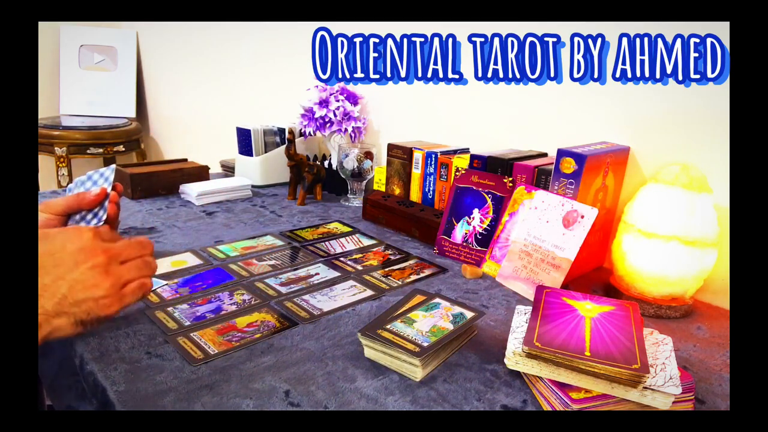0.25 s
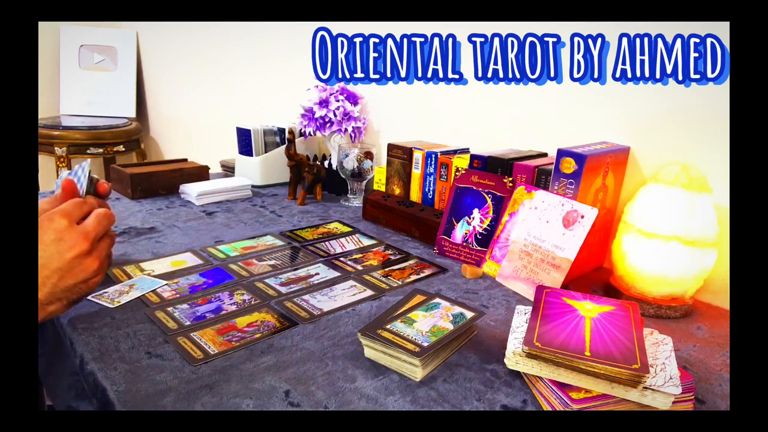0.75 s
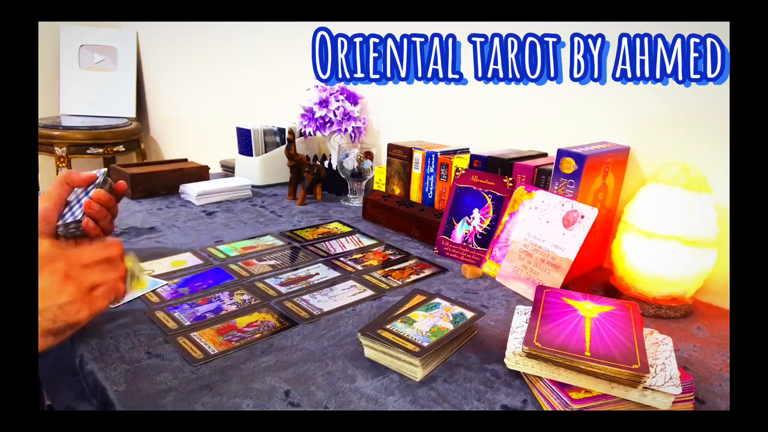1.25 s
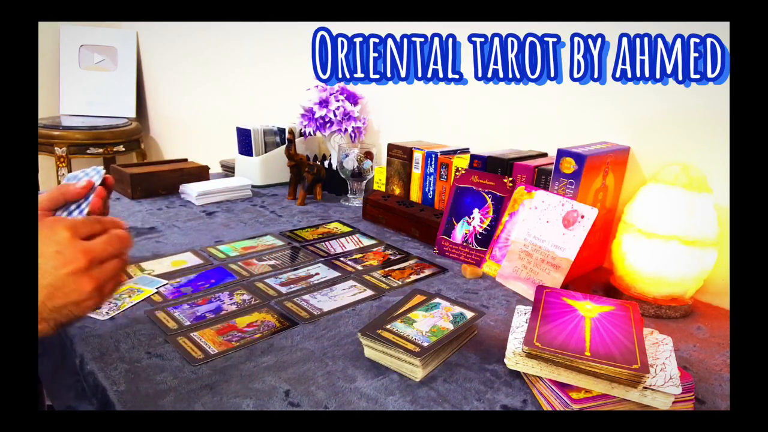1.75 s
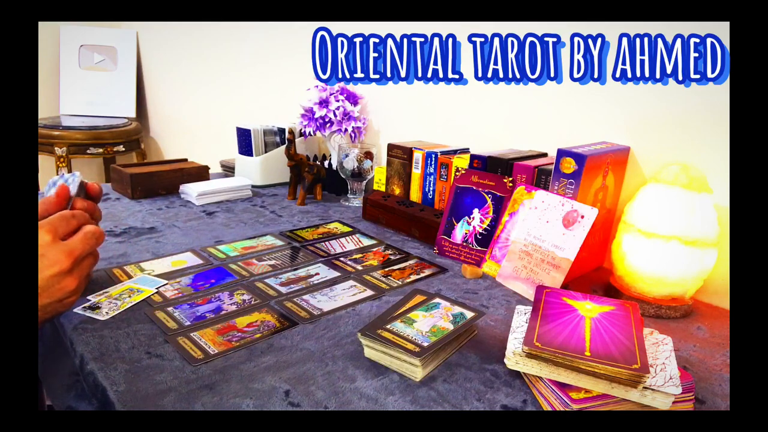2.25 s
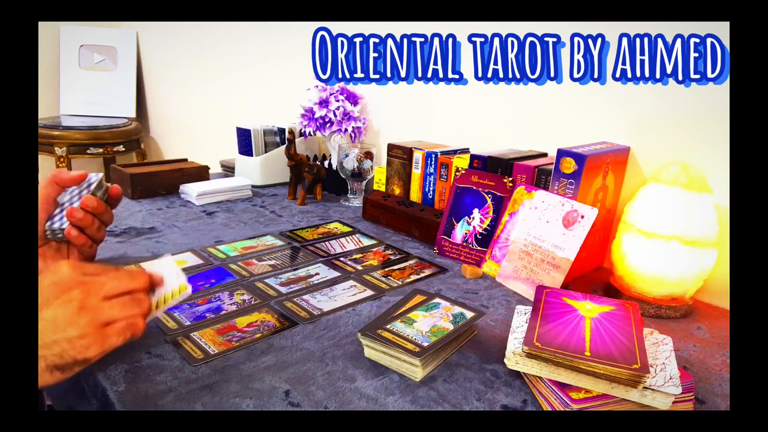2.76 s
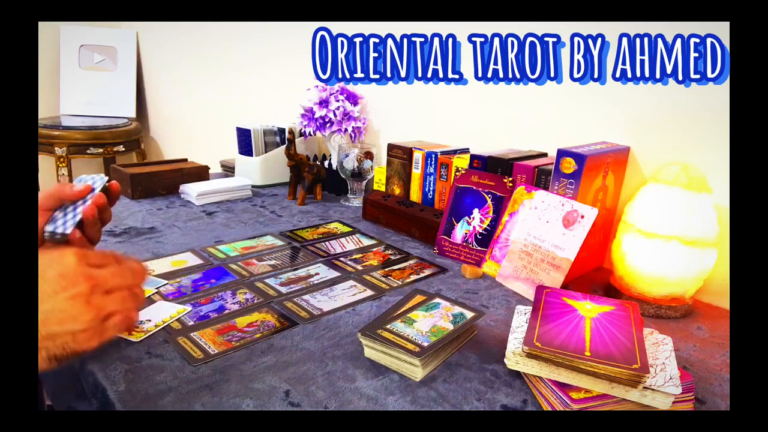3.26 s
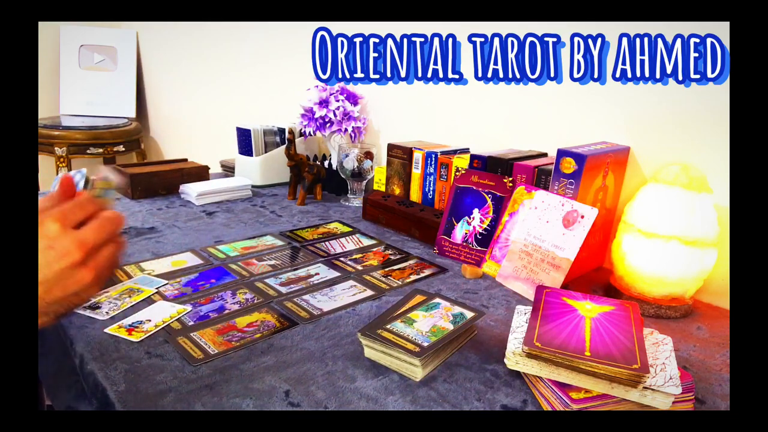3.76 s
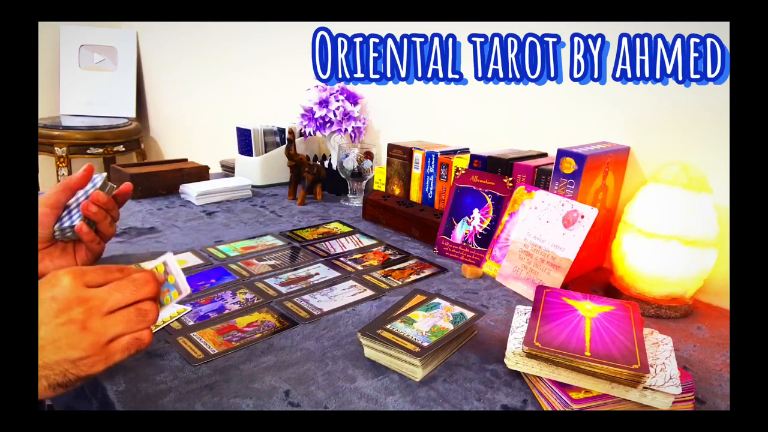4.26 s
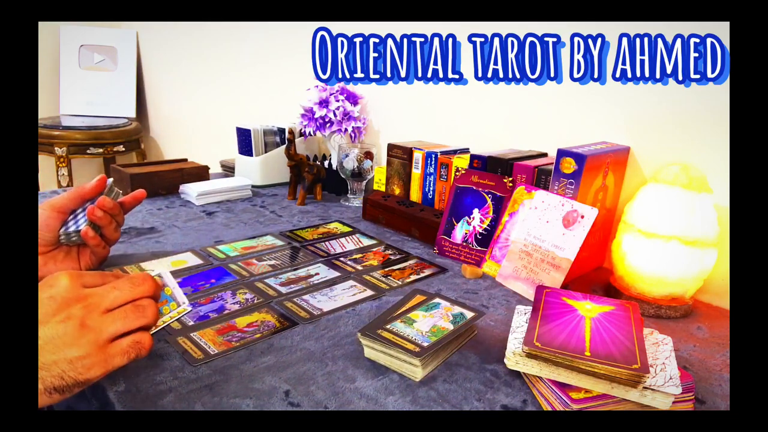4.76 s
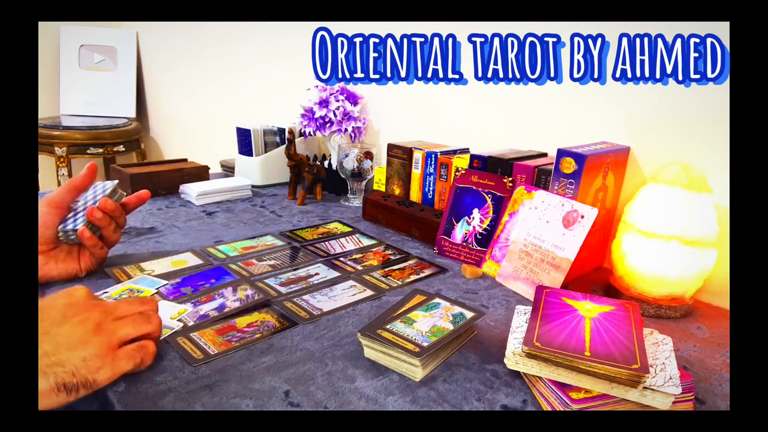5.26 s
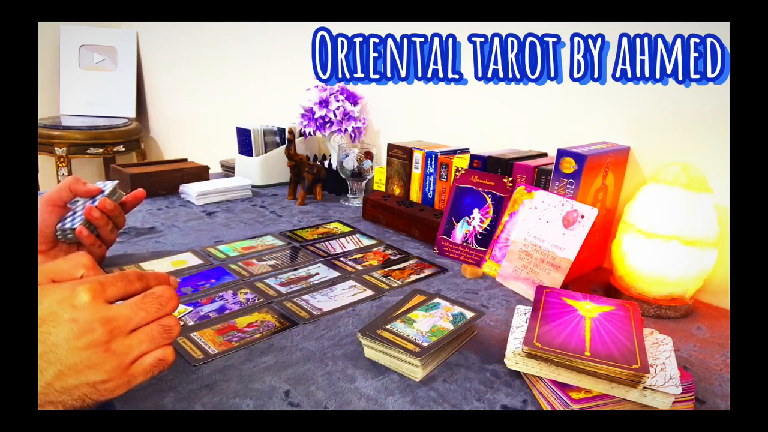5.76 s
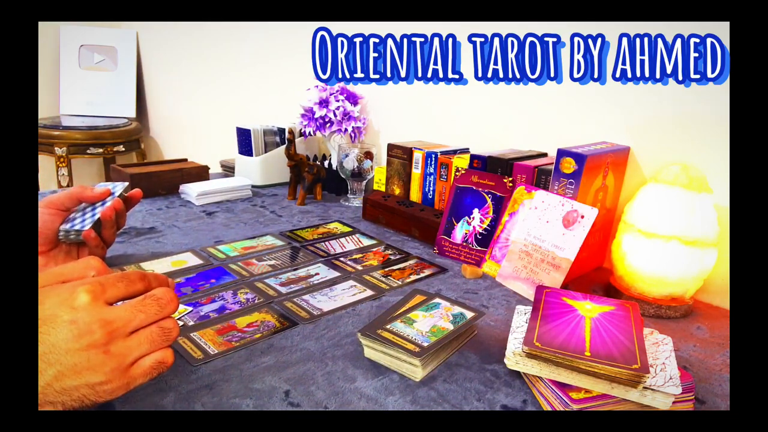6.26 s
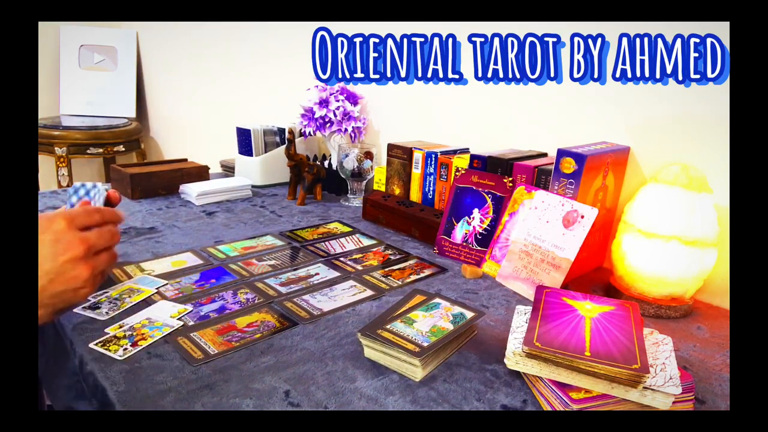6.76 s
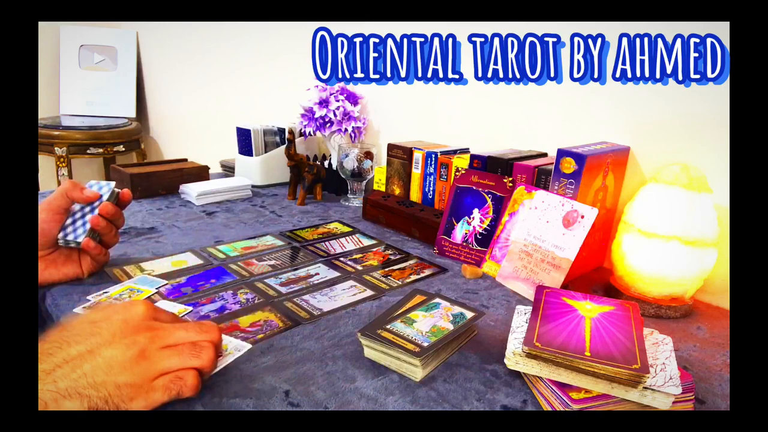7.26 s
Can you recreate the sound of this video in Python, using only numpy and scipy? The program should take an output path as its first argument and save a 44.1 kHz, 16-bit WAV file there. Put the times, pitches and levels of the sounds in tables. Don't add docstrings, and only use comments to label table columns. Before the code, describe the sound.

Someone deals cards one by one close to the microphone: dry snaps, soft rasps and corner clicks, two very loud, over low rumble and faint hiss.

```python
import sys
import numpy as np
from scipy import signal
from scipy.fft import rfft, irfft
from scipy.io import wavfile
from scipy.ndimage import uniform_filter1d

SR = 44100
rng = np.random.default_rng(int(sys.argv[2]) if len(sys.argv) > 2 else 0)


def unload_wav(signal):
    wavfile.write(
        sys.argv[1],
        SR,
        np.round(np.clip(np.atleast_2d(signal).T, -1, 1) * 32767).astype(np.int16),
    )


def ratio(d):
    e = np.asarray(d, float) / 20
    return 10 ** e


N = 331632


def level(x, db=0):
    return x * ratio(db) / np.sqrt(np.mean(x ** 2))


def add(out, start_s, piece):
    i = max(int(start_s * SR), 0)
    out[i:i + len(piece)] += piece[:len(out) - i]


def decay(t, t60):
    return np.exp(-np.log(1000) * t / t60)


def ring(x, hz, width_hz):
    return signal.lfilter(*signal.iirpeak(hz, hz / width_hz, SR), x)


def ring_twice(x, hz, width_hz):
    return ring(ring(x, hz, width_hz), hz, width_hz)


def struck(hz, width_hz):
    blow = ring_twice(signal.unit_impulse(1024), hz, width_hz)
    return blow / np.abs(blow).max()


def chord(modes):
    return sum((-1) ** k * ratio(db) * struck(hz, width_hz) for k, (hz, width_hz, db) in enumerate(modes))


def colour(x, points):
    hz, db = np.transpose(points)
    bin_hz = np.maximum(np.arange(len(x) // 2 + 1) * SR / len(x), 1)
    gain_db = np.interp(np.log(bin_hz), np.log(hz), db)
    return irfft(rfft(x) * ratio(gain_db), len(x))


def walk(rate_hz):
    hold = int(SR / rate_hz)
    steps = np.repeat(rng.standard_normal(N // hold + 1), hold)
    smooth = uniform_filter1d(uniform_filter1d(steps, hold), hold)
    return level(smooth[:N])


# (frequency [Hz], density [dB per Hz])
HUSH = [(88, -34.5), (150, -2), (250, -7), (400, -12), (594, -17.5), (1900, -24), (15000, -32.5),
        (16500, -48.5)]


def hiss():
    return level(colour(rng.standard_normal(N), HUSH), -59.5) * ratio(0.35 * walk(1.2))


# (time [s], level [dB])
RUMBLE = [(0, -53), (.14, -47), (.45, -53), (.8, -47), (1.0, -46), (1.25, -53), (1.45, -39), (1.76, -36),
          (1.88, -44), (2.56, -46), (2.9, -51), (3.05, -46), (3.55, -54), (4.5, -52), (5.3, -50),
          (5.85, -57), (6.5, -52), (7.2, -49)]
# (frequency [Hz], width [Hz], level [dB])
RUMBLE_MODES = [(45.8, 12.2, 1.5), (75.5, 30, -4), (132.2, 25, -8.5), (228, 96, -18.5)]


def rumble(drift_db=-11, still_air_db=-60, sweep_db=-32, sweep_s=0.12, wander_db=2.1):
    t = np.arange(N) / SR
    load = ratio(np.interp(t, *np.transpose(RUMBLE)))
    modes = np.zeros(N)
    for hz, width_hz, db in RUMBLE_MODES:
        mode = level(ring_twice(rng.standard_normal(N), hz, width_hz), db)
        modes += mode * ratio(wander_db * walk(2.7))
    hum = level(ring_twice(rng.standard_normal(N), 48, 14), -62)
    drift = level(ring_twice(rng.standard_normal(N), 11.4, 15))
    sweeps = sum(push * np.exp(-np.abs(t - s) / sweep_s) for s, *_, push in SNAPS)
    drift_gain = ratio(drift_db) * load + ratio(still_air_db) + ratio(sweep_db) * sweeps
    return level(modes, 3) * load + hum + drift * drift_gain


def swell_fade(t, peak_s, rise_s, fall_s, db):
    return ratio(db - 20 * np.where(t < peak_s, (peak_s - t) / rise_s, (t - peak_s) / fall_s))


# (frequency [Hz], density [dB per Hz])
RASP = [(1880, -49), (3200, -21), (3900, -7), (5560, -1.5), (6800, -0.5), (9500, -11), (13000, -42.5),
        (22000, -120)]
# (fastest at [s], 20 dB rise [s], 20 dB fall [s], rasp level [dB], relative scrape [dB])
DRAGS = [(0.098, .08, 0.09, -57, 1.5), (.6, .2, .15, -66, -5), (.635, 0.02, .05, -60, -3),
         (.858, 0.04, .01, -38, -6), (1.92, .22, 0.1, -65, -2), (2.06, .12, 0.13, -61, -6),
         (2.18, -0.07, -0.02, -57.5, -11), (2.285, 0.05, 0.36, -60, -3), (2.41, .14, .07, -52, -12),
         (3.362, 0.1, 0.08, -61, 1.5), (3.554, 0.08, .18, -59, -2.5), (3.722, .035, .075, -41, -2.5),
         (5.265, .07, .15, -54, -5), (6.681, 0.25, 0.1, -64, -1), (6.835, 0.06, 0.06, -53, -7),
         (6.868, .012, .035, -52, 2.5), (7.45, .12, 1, -61, .7), (3.042, .03, .015, -55, 1.5),
         (1.42, .05, .015, -51, -9)]
# (hardest at [s], 20 dB rise [s], 20 dB fall [s], rasp level [dB])
PRESSES = [
    (.005, 1, .06, -67),
    (0.816, 0.03, .09, -56),
    (.887, .011, 0.0263, -53),
    (1.355, -0.03, 0.12, -59),
    (2.355, .04, .04, -59),
    (2.478, .045, 0.1057, -49),
    (6.935, 0.08, 0.03, -58),
    (7.265, .04, 0.1, -59),
]


def slides(grain_db=2.5, patchy_db=2.5, drag_fizz_db=-8.5, press_scrape_db=7, press_fizz_db=-3):
    gains, t = np.zeros((3, N)), np.arange(N) / SR
    strokes = [(*row, drag_fizz_db) for row in DRAGS]
    strokes += [(*row, press_scrape_db, press_fizz_db) for row in PRESSES]
    for peak_s, rise_s, fall_s, db, scrape_db, fizz_db in strokes:
        on = slice(max(int((peak_s - 2 * rise_s) * SR), 0), int((peak_s + 2 * fall_s) * SR))
        layers = ratio(np.array([[0], [scrape_db], [fizz_db]]))
        gains[:, on] += swell_fade(t[on], peak_s, rise_s, fall_s, db) * layers
    slips = rng.standard_normal((2, N)) * ratio(grain_db * rng.exponential(size=(2, N)))
    flicker = ratio(patchy_db * walk(60))
    rasp = level(colour(slips[0], RASP)) * flicker
    scrape = level(ring_twice(slips[1], 1150, 1450)) * ratio(patchy_db * walk(60))
    fizz = level(ring_twice(slips[0], 12500, 5500)) * flicker
    return gains[0] * rasp + gains[1] * scrape + gains[2] * fizz


# (time [s], bright peak [dB], relative middle [dB], relative low [dB])
TICKS = [(0.0226, -49.5, -25, 3), (0.564, -48, -22, -5), (0.625, -42, -11.5, -17), (1.32, -20, -14, -10.5),
         (1.914, -41.5, -18, -11), (2.0457, -43, -13, -17), (2.1402, -52.5, -6, -7), (2.18, -45, -30, -20),
         (2.3121, -39.5, -28, -7.5), (2.3797, -39, -25, -5), (2.8936, -35, -1, 0), (3.063, -36, -16, -28),
         (3.6334, -26.5, -21, -12.5), (3.6555, -42, -6, -6), (4.2084, -49, -11.5, 3.5),
         (4.243, -49, -16.5, -4), (4.2627, -50, -18, 6), (4.2944, -53, -20, -10), (4.6727, -36, -9, -5.5),
         (4.7136, -46, -6.5, 1), (4.7685, -39.5, -5, -3), (5.1266, -37.5, -8.5, -10),
         (5.241, -39, -15, -10), (6.7339, -50.5, 1, 4), (6.8438, -21.5, -25, -16.5),
         (7.216, -33, -7.5, -4.5), (7.2584, -38, -20, -6), (7.2732, -30.5, -8, -4)]


def ticks(crack_ms=4.1, rattle=0.26, body_db=8, late_s=0.00053):
    out, t = np.zeros(N), np.arange(512) / SR
    for s, db, mid_db, low_db in TICKS:
        chance = rng.standard_normal(len(t))
        crack = signal.unit_impulse(len(t)) + rattle * chance * decay(t * 1000, crack_ms)
        bright = ring_twice(crack, 6900 + 45 * mid_db, 3200)
        middle = ring_twice(crack, 2600, 1700)
        low = ring(crack, 1150, 800) - 0.92 * ring(crack, 550, 447)
        top = ring_twice(crack, 14000, 7000)
        top_db = -21 + 0.45 * (db + 40)
        parts = [(bright, 0), (-middle, mid_db + body_db + 3), (low, low_db + body_db), (-top, top_db)]
        add(out, s + late_s, sum(ratio(db + rel_db) * p / np.abs(p).max() for p, rel_db in parts))
    return out


# (time [s], peak [dB], ring [Hz], t60 [ms], sign [+-1])
THUMPS = [
    (0.1138, -15.5, 228, 11, -1),
    (0.898, -21, 112, 45, -1),
    (1.4341, -17.5, 380, 5.1, 1),
    (2.171, -37, 283, 63, 1),
    (2.4885, -5.5, 75, 25, 1),
    (2.4983, -14, 59, 30, -1),
    (3.051, -24, 220, 24, -1),
    (6.845, -29.5, 422, 14, 1),
    (7.216, -33, 297, 15, 1),
    (7.281, -30, 250, 20, -1),
]
# (time [s], peak [dB], ring [Hz], t60 [ms], sign [+-1])
CLACKS = [(0.113, -21.5, 1180, 11, -1), (0.1156, -27, 730, 5.5, 1), (.1125, -28, 2650, 19, 1),
          (0.8908, -15.5, 2125, 14.6, 1), (.8980, -13, 960, 14, 1), (0.8981, -22.5, 590, 35, 1),
          (2.4890, -7, 637, 10.7, -1), (2.4903, -9, 4730, 5.3, 1), (2.4906, -7, 2090, 5.5, 1),
          (2.4957, -18.5, 1470, 9.3, -1), (3.7805, -3.5, 679, 15.5, -1), (3.7815, 0.5, 1880, 3.9, -1),
          (3.7815, -5, 1050, 8.5, -1), (3.775, -24, 2973, 8.6, 1), (5.257, -38, 1330, 12, -1),
          (5.2975, -31.5, 4090, 14, 1), (5.301, -26, 1500, 6.7, -1), (6.9410, -14, 2220, 12, 1),
          (6.9480, -19, 1000, 10, -1), (7.2349, -20, 680, 4.9, 1), (7.2802, -25.5, 1350, 7.9, -1),
          (1.3205, -27, 900, 8, 1), (.0226, -40, 1000, 9, 1)]


def knocks():
    out, t = np.zeros(N), np.arange(4096) / SR
    for s, db, hz, t60_ms, sign in THUMPS + CLACKS:
        add(out, s, sign * ratio(db) * decay(t * 1000, t60_ms) * np.sin(2 * np.pi * hz * t))
    return out


# (release [s], chatter peak [dB], build-up [ms], first chatter [Hz], air push [0-1])
SNAPS = [
    (0.1142, -28.5, 1.95, 5260, 0.04),
    (0.894, -23, 2.12, 4000, 0.33),
    (1.4334, -27, 1.85, 6900, 0.03),
    (2.4900, -13, 1.23, 4314, 0.27),
    (3.0516, -19.5, 1.02, 5630, 0.03),
    (3.7800, -18, 1.84, 5200, 0.25),
    (5.3020, -30.5, 1.63, 6500, 0.05),
    (6.9466, -20, 2.65, 6000, 0.13),
    (7.2837, -39, 1.7, 5100, 0.06),
]


def snaps(rough=0.13, fizz_db=-9, settle_ms=0.31, recoil_ms=1.6, recoil=0.2):
    edge, puff, t = np.zeros(N), np.zeros(N), (np.arange(2048) - 1024) / SR
    t_ms = t * 1000
    after_ms = np.maximum(t_ms, 0)
    for s, db, build_ms, first_hz, push in SNAPS:
        jitter, fizz = rng.standard_normal((2, len(t)))
        last_hz = 8760 - 800 * build_ms
        grow = np.exp(np.minimum(t_ms, 0) / build_ms)
        caught = np.clip(t_ms / build_ms / 2 + 1.65, 0, 1)
        swell = caught * grow ** 0.39 * np.exp(-after_ms / settle_ms)
        glide_hz = first_hz + (last_hz - first_hz) * grow ** 1.495
        hz = glide_hz * (1 + rough * level(uniform_filter1d(jitter, size=12)))
        phase = 2 * np.pi * np.cumsum(hz) / SR
        chatter = np.sin(phase) + 0.14 * np.sin(2 * phase) + ratio(fizz_db) * fizz
        after = after_ms / recoil_ms
        spring_back = np.exp(-after * 12) - recoil * np.e * after * np.exp(-after)
        air = np.where(t < 0, grow ** 1.5, spring_back)
        add(edge, s + t[0], ratio(db) * swell * chatter)
        add(puff, s + t[0], push * air)
    return edge, puff


# (time [s], peak [dB], tilt [dB per octave])
THROWN = [(.114, -22, -.2), (.895, -20.5, .9), (1.320, -29, 1.6), (1.434, -26, -2.5), (2.491, -19, -.2),
          (3.052, -28, -.3), (3.781, -15, -.8), (5.302, -27.5, -1.8), (6.947, -24, 2.2), (7.234, -34, -3),
          (7.281, -30.5, -1.1)]
# (frequency [Hz], width [Hz], level [dB])
FLEX_MODES = [(380, 400, -0.5), (980, 1010, -2), (2405, 1600, 1), (5200, 2800, -4), (10500, 6000, -2.5)]
# (time [s], frequency [Hz], width [Hz], lift [dB])
THROWN_RINGS = [(.114, 5400, 900, 4), (.114, 2750, 800, -4), (.114, 4400, 600, 4), (.895, 600, 400, -1.5),
                (2.492, 600, 350, 6), (2.491, 3680, 600, 6), (2.492, 4850, 600, 4), (3.051, 350, 300, .5),
                (3.052, 5500, 1800, 16), (3.052, 7800, 1000, 9), (3.052, 10500, 2000, 14),
                (3.781, 686, 450, -1.5), (3.781, 1400, 1000, 4), (3.78, 2976, 800, 4.5),
                (3.781, 7100, 600, 4), (5.302, 1900, 900, 3), (5.302, 4150, 500, 11),
                (6.947, 2500, 500, 1.5), (7.281, 1360, 400, 4)]


def thrown():
    out, times, cracks = np.zeros(N), np.array(THROWN)[:, 0], []
    for s, db, tilt_db in THROWN:
        modes = [(hz, w, mode_db + db + tilt_db * np.log2(hz / 1500)) for hz, w, mode_db in FLEX_MODES]
        cracks.append(chord(modes))
        add(out, s, cracks[-1])
    for s, hz, width_hz, lift_db in THROWN_RINGS:
        k = np.argmin(np.abs(times - s))
        add(out, times[k], ratio(lift_db) * ring_twice(cracks[k], hz, width_hz))
    return out


# (time [s], peak [dB], relative upper ring [dB])
FAR = [
    (5.79, -49.5, -15),
    (6.1651, -42.5, -6.5),
]
# (frequency [Hz], width [Hz], level [dB])
FAR_MODES = [(1825, 184, -1), (2170, 440, -0.5), (3510, 430, -4)]


def far_taps():
    out = np.zeros(N)
    lower, upper = chord(FAR_MODES[:2]), chord(FAR_MODES[2:])
    for s, db, upper_db in FAR:
        add(out, s, ratio(db - 1.5) * (lower + ratio(upper_db) * upper))
    return out


def off_table(x):
    return x - 0.45 * ring(x, 3250, 1000)


def clutter(x, scatter_db=-6.5, t60_s=0.025):
    t = np.arange(1536) / SR
    scatter = rng.standard_normal(len(t)) * decay(t, t60_s)
    return x + signal.fftconvolve(x, ratio(scatter_db) * scatter / np.sqrt(np.sum(scatter ** 2)))[:N]


# (frequency [Hz], t60 [s], level [dB])
ROOM = [(250, 1.16, -4), (600, 1.08, -3.5), (1500, 1.08, -2), (2980, 1.015, 3.5), (6000, .6, 6),
        (12000, 0.58, 1)]


def room(x, tail_db=-10.5, rise_s=0.017):
    t, tail = np.arange(SR) / SR, np.zeros(SR)
    for hz, t60_s, db in ROOM:
        tail += level(ring(rng.standard_normal(SR), hz, hz) * decay(t, t60_s), db)
    tail *= 1 - np.exp(-(t / rise_s) ** 2)
    return signal.fftconvolve(x, ratio(tail_db) * tail / np.sqrt(np.sum(tail ** 2)))[:N]


def scene():
    slide, tick = off_table(slides()), off_table(ticks())
    table = knocks()
    edge, puff = snaps()
    edge = off_table(edge)
    far = far_taps()
    to_walls = slide + ratio(-6) * tick + ratio(-9) * edge + ratio(-15) * table + thrown() + ratio(14) * far
    near = clutter(edge + tick + slide + table + far)
    return (near + puff + room(to_walls) + rumble() + hiss())[None]


def band_limit(x):
    return signal.sosfilt(signal.butter(12, 16810, fs=SR, output="sos"), x)


def record(dry):
    top_cut = signal.ellip(8, 0.2, 60, 15880, fs=SR, output="sos")
    mix = signal.sosfilt(top_cut, np.clip(dry, -0.93, 0.93))
    return band_limit(mix)


dry = scene()
out = record(dry)
unload_wav(out)
```